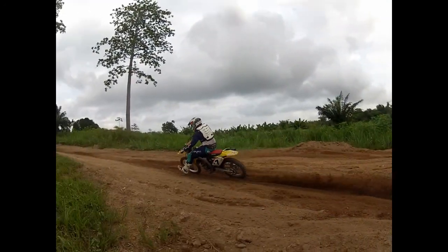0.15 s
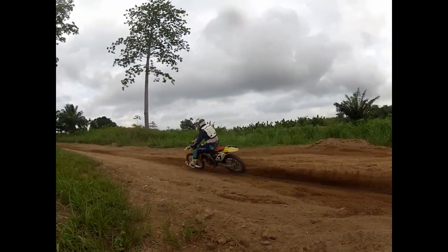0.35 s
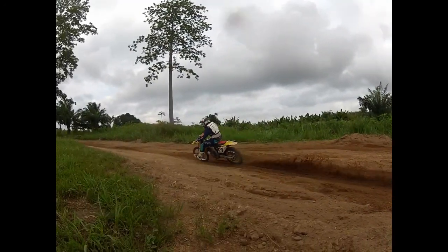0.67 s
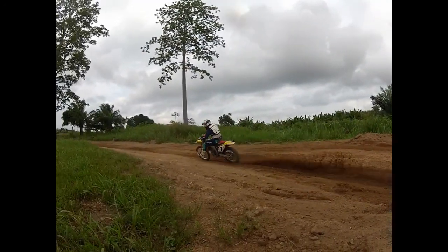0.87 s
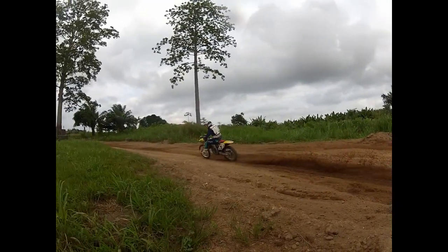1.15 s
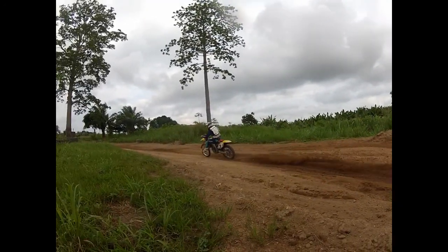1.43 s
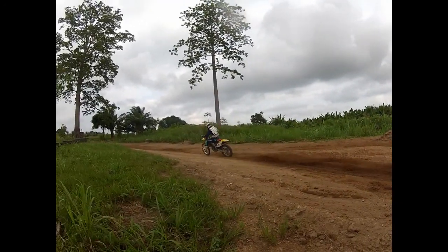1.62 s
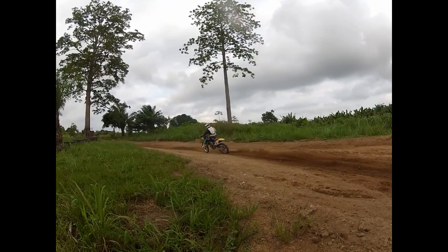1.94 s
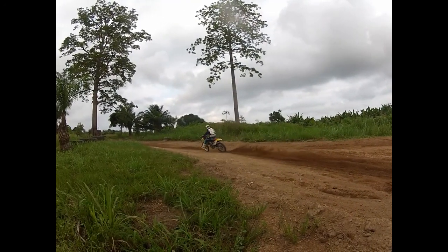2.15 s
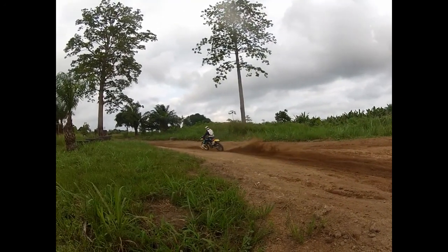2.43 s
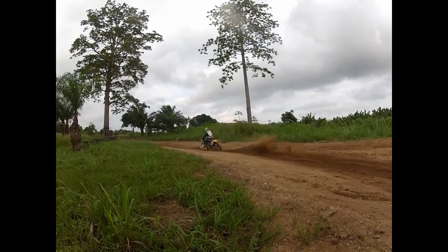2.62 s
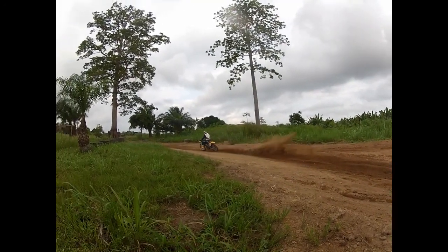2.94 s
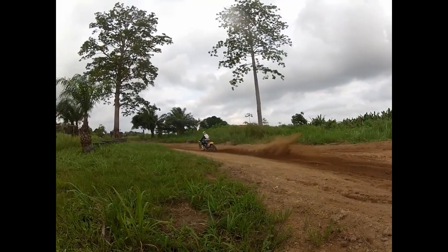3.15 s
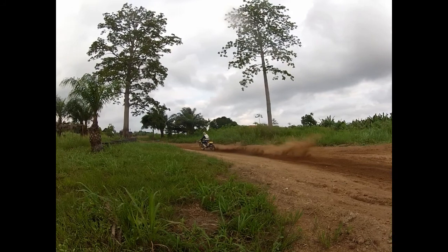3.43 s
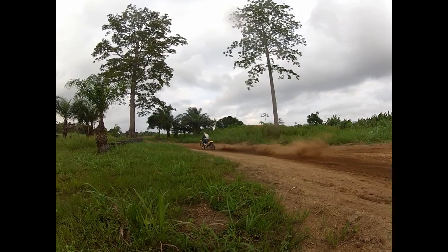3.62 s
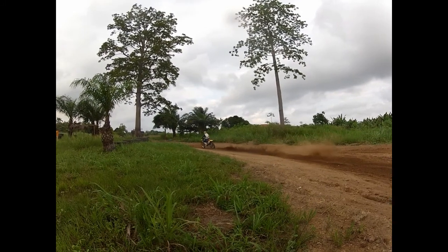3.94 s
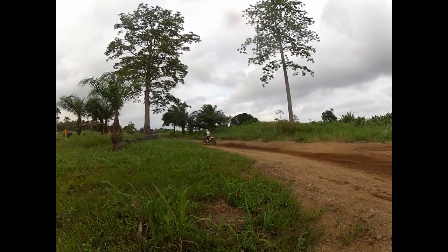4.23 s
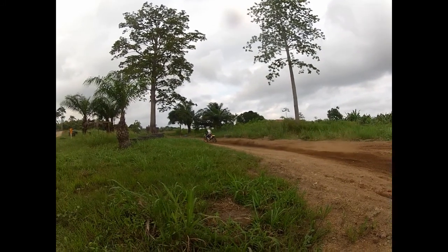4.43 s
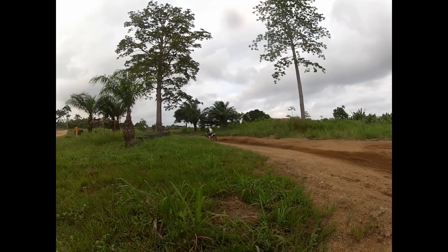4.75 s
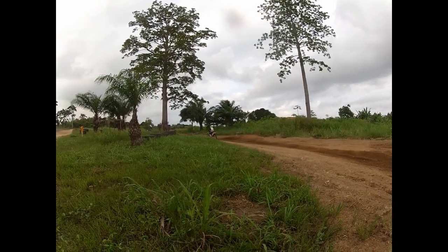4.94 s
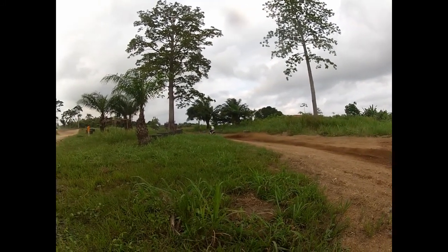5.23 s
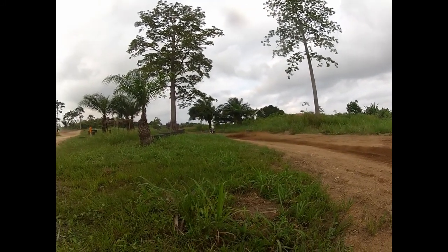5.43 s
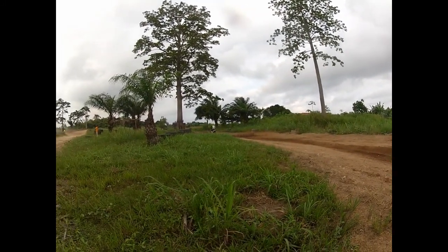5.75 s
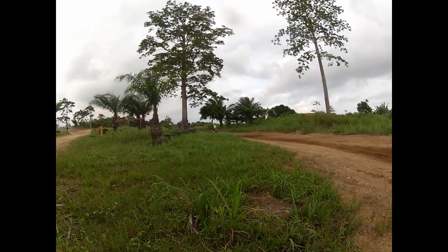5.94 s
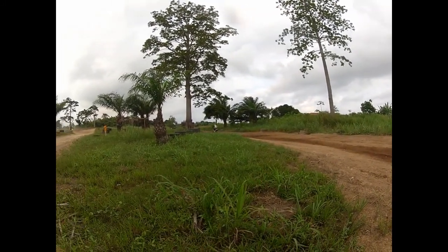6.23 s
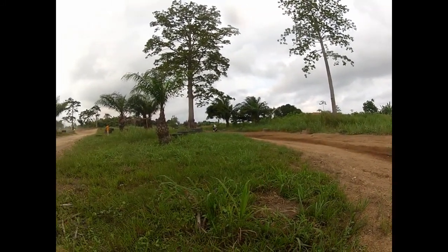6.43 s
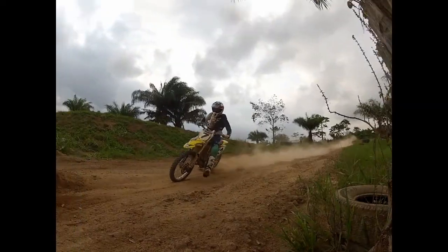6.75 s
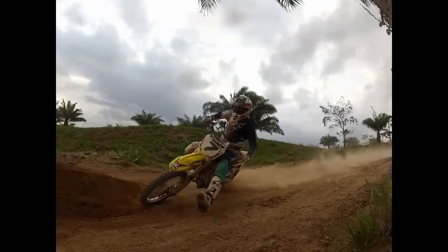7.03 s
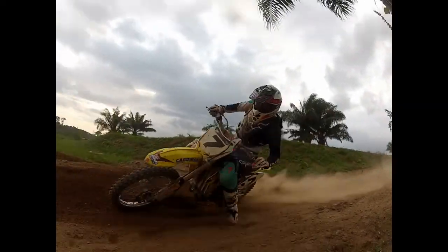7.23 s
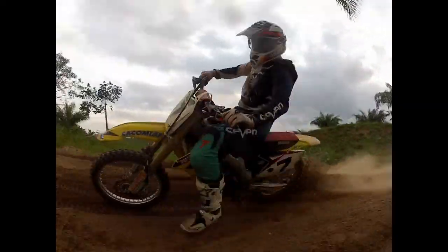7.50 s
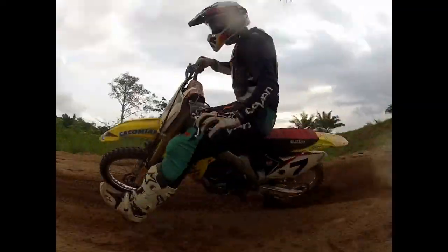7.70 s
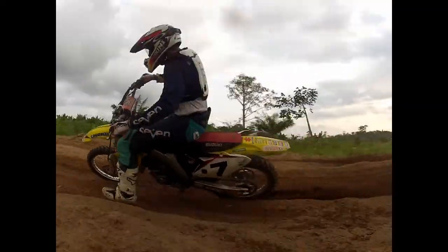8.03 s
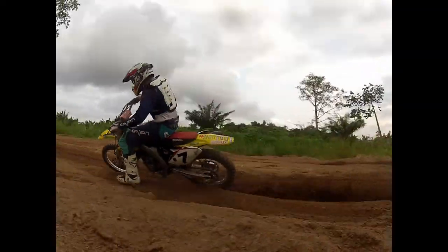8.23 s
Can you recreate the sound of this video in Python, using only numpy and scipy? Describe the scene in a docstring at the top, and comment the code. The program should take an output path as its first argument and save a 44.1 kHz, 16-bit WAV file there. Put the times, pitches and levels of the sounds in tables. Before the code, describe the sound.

A slowed-down dirt bike engine putters and rasps into the distance, then returns and accelerates loudly through a nearby corner.

```python
"""Dirt bike in slow motion

A single-cylinder four-stroke bike rides away round a bend, then brakes into a corner close by.
Each firing thumps the exhaust pipe and blows rasping gas through the silencer; some crack louder.
Slowing holds each sample, which mirrors the sound into the treble. Riding away, it stutters each second."""
import sys
import numpy as np
from scipy import signal
from scipy.io import wavfile
from scipy.ndimage import uniform_filter1d

SR = 44100
rng = np.random.default_rng(int(sys.argv[2]) if len(sys.argv) > 2 else 0)


def unload_audio(sound):
    """Save the sound as a 16-bit wav file, at the path given as the first command line argument."""
    columns = np.transpose(np.atleast_2d(sound))
    # keep every value between -1 and 1, then stretch to whole-number steps
    steps = np.round(np.clip(columns, -1, 1) * 32767)
    wavfile.write(sys.argv[1], SR, steps.astype(np.int16))


N = 369116

# How far the engine has run: time_s, firings_so_far
AWAY_FIRINGS = [(-0.032, 0), (0.443, 9), (0.86, 17), (1.274, 25), (1.475, 29), (1.759, 35), (1.935, 39),
                (2.235, 46), (2.458, 51), (2.813, 59), (3.292, 70), (3.739, 80), (3.864, 83), (4.147, 90),
                (4.379, 96), (4.564, 101), (4.779, 107), (5.005, 113), (5.309, 121), (5.594, 128),
                (6.47, 144)]
# Loudness of the gas rasp, crank hum and pipe rings:
# time_s, main_rasp_db, dark_rasp_db, bright_rasp_db, hum_db, low_ring_db, middle_ring_db, upper_ring_db
AWAY_LEVELS = [(0.04, -28, -23.5, -30, -26, -23, -24.5, -23.5),
               (0.15, -27.5, -28.5, -30.5, -29.5, -26, -29.5, -31),
               (0.51, -22.5, -29, -28, -25.5, -24.5, -25.5, -28.5),
               (0.54, -31, -23, -30.5, -32, -26.5, -33, -38),
               (0.66, -28, -26.5, -30.5, -28, -30.5, -27, -30.5),
               (1.2, -27, -28, -30.5, -26, -27.5, -27, -34.5), (1.24, -19, -28, -23.5, -26, -27, -25, -31),
               (1.33, -25, -29.5, -31, -31.5, -25, -32, -34),
               (1.9, -25.5, -23, -27.5, -23.5, -27.5, -29, -36.5),
               (2.19, -31.5, -26.5, -35, -27, -39, -33.5, -58),
               (2.39, -33.5, -25, -33.5, -32, -29, -36.5, -46),
               (2.56, -20, -24.5, -26, -27.5, -27, -32, -43),
               (3.17, -23.5, -27.5, -29, -30, -28.5, -33, -50),
               (3.66, -17, -31, -24.5, -31, -28.5, -34, -39.5),
               (4.05, -23, -27.5, -29.5, -31.5, -38, -38.5, -40.5),
               (4.55, -23.5, -29.5, -28.5, -25, -40.5, -37, -39),
               (5.16, -22.5, -32.5, -28.5, -34, -36.5, -40.5, -41.5),
               (5.25, -22, -26.5, -28.5, -29.5, -39.5, -40, -50),
               (5.29, -36, -39, -37.5, -37, -39, -63, -57), (5.45, -50, -52, -54, -44, -52, -57, -65),
               (5.77, -32, -39.5, -36.5, -36.5, -37.5, -47, -62),
               (6.06, -39, -39.5, -43, -37, -39, -51, -58), (6.27, -50, -48.5, -52.5, -43, -49.5, -60, -66),
               (6.47, -58, -61, -61.5, -44, -53, -67, -69)]
# The pipe's low ring: time_s, pitch_hz
AWAY_PITCH = [(0.0, 92.5), (1.2, 98.7), (2.301, 109), (3.601, 107.9), (4.601, 97), (6.502, 78)]
# Firings that crack louder: start_s, strength_db
AWAY_CRACKS = [(0.022, 0.5), (0.076, 3), (0.6, -3.5), (0.65, 2), (0.703, 1), (0.758, -10.5), (0.808, -5.5),
               (0.86, -2), (0.912, 4.5), (0.962, 3), (1.224, 2), (1.474, 0.5), (1.806, 1), (2.416, -10.5),
               (2.459, -8), (2.678, -47), (2.723, -5), (2.765, -5), (2.991, -3.5), (3.031, -2), (3.293, -9),
               (3.341, -3.5), (3.616, -8), (4.34, -5.5), (4.569, -12), (4.742, -4), (4.897, -2.5),
               (5.007, -4), (5.599, -17)]
# Silencer tones for the rasp and for the cracks: pitch_hz, width_hz, gain_db
AWAY_RASP_TONES = [(564, 207, 7), (630, 128, 10), (775.2, 31.7, 2.5), (898, 75, -17), (1233, 173, 5.5),
                   (1643, 60, -24), (1754, 43, -2), (2437, 51, -1.5), (2660, 120, -6.5), (2981, 52, 3.5),
                   (3401, 52.3, 7.5), (3663, 87, -3), (4180, 300, -14)]
AWAY_CRACK_TONES = [(627, 146, -7), (1282, 53, -5.5), (1535, 57, -13), (1960, 37, -22), (2270, 41, -18.5),
                    (2910, 120, -18.5), (3110, 17, -23.5), (3420, 110, -16.5)]


def riding_away():
    """The bike pulls away, eases off near 5.3 s, then briefly picks up again, quieter and slower."""
    start, sound = engine(
        AWAY_FIRINGS, AWAY_LEVELS, span_s=(0, 6.484), coast_end_s=-1, repeat_share=.38,
        pipe=dict(pitch=AWAY_PITCH, middle_hz=143.4, upper_ratio=2.207, overtone_db=-9, lead_s=.0005,
                  decays_s=(.012, .011, .007, .0077), middle_delay_s=0, return_s=.02207, return_db=-3.5),
        rasp=dict(tones=AWAY_RASP_TONES, main_band_hz=(690, 980), uneven_db=1.46, hiss_db=-15.5,
                  rises_s=(.0008, .003, .001), decay_s=.018, stretches=(.45, 2.8, 1.1), shape=.75,
                  bends=(.05, .045, .015), echo_s=.024, echo_db=-20),
        crack=dict(listed=AWAY_CRACKS, tones=AWAY_CRACK_TONES, gain_db=20, decay_s=.0043, shape=1.53))
    sound = hold_samples(sound, 8400)
    # cut out most of the first mirror image and dim the higher ones
    low = signal.sosfilt(signal.ellip(10, .5, 55, 5330, fs=SR, output="sos"), sound)
    top = signal.sosfilt(signal.ellip(8, .5, 34, 11450, "high", fs=SR, output="sos"), sound)
    return start, stutter(low + from_db(-6) * filtered(top, 3, 13500, "low"))


# How far the engine has run: time_s, firings_so_far
CORNER_FIRINGS = [(6.496, 0), (6.65, 3), (6.785, 6), (6.86, 8), (6.924, 10), (6.978, 12), (7.097, 17),
                  (7.183, 20), (7.417, 27), (7.556, 32), (7.675, 36), (7.724, 38), (7.814, 42), (7.91, 46),
                  (8.089, 53), (8.376, 64)]
# Loudness of the gas rasp, crank hum and pipe rings:
# time_s, main_rasp_db, dark_rasp_db, bright_rasp_db, hum_db, low_ring_db, middle_ring_db, upper_ring_db
CORNER_LEVELS = [(6.5, -64.5, -70, -67, -54, -43.5, -45, -57),
                 (6.808, -58.5, -64, -61, -45, -35, -46.5, -44),
                 (6.974, -50.5, -58, -52, -45, -31, -44, -45),
                 (7.058, -47.5, -52, -48.5, -42, -31, -36, -44), (7.176, -53, -53, -53, -47, -31, -50, -50),
                 (7.294, -43.5, -45, -46, -49, -28, -47, -32),
                 (7.652, -44.5, -46, -48, -32, -24.5, -50, -50), (7.686, -43, -39, -49, -27, -34, -30, -39),
                 (7.7, -27, -29, -29.5, -26, -21.5, -23, -21.5),
                 (7.734, -21.5, -25, -26, -25, -23, -15.5, -20.5),
                 (7.822, -29, -28, -30.5, -29, -21.5, -20, -21.5),
                 (7.946, -27.5, -27.5, -25, -25.5, -26, -16.5, -21),
                 (8.122, -28, -27, -29, -26, -22.5, -19, -19.5),
                 (8.254, -26.5, -33, -29.5, -35, -29, -21.5, -21),
                 (8.26, -28, -32.5, -30.5, -28, -26, -21.5, -23.5)]
# The pipe's low ring: time_s, pitch_hz
CORNER_PITCH = [(6.5, 149), (6.82, 151), (6.95, 183), (7.07, 192), (7.2, 155), (7.42, 148), (7.48, 193),
                (7.54, 145), (7.66, 128), (7.7, 152), (8.37, 149)]
# Silencer tones for both rasp and cracks: pitch_hz, width_hz, gain_db
CORNER_TONES = [(512, 72, 1), (810, 250, -1.5), (1170, 99, -0.5), (1608, 260, 11), (2240, 286, 9.5),
                (3490, 400, 3), (4750, 860, 3.5), (4940, 960, 3)]


def cornering():
    """The bike coasts into the corner; then the throttle opens and every firing cracks."""
    start, sound = engine(
        CORNER_FIRINGS, CORNER_LEVELS, span_s=(6.495, 8.37), coast_end_s=7.69, repeat_share=.39,
        pipe=dict(pitch=CORNER_PITCH, middle_hz=251.8, upper_ratio=2.05, overtone_db=-20.5,
                  lead_s=.0011, decays_s=(.017, .011, .0094, .007), middle_delay_s=.01118),
        rasp=dict(tones=CORNER_TONES, main_band_hz=(1300, 3000), uneven_db=-1.3, hiss_db=-18,
                  rises_s=(.0008, .001, .001), decay_s=.0082, stretches=(1.2, 1.4, 1.4), shape=1.03,
                  bends=(.03, .03, .01), echo_s=.016, echo_db=-29),
        crack=dict(tones=CORNER_TONES, gain_db=-5.5, decay_s=.0053, shape=1.6))
    return start, hold_samples(sound, 12000)


def engine(firings, levels, span_s, coast_end_s, repeat_share, pipe, rasp, crack):
    """The firings drive thump, rasp, cracks and hum. Returns the start sample and the sound."""
    start, stop = round(span_s[0] * SR), min(round(span_s[1] * SR), N)
    t = np.arange(start, stop) / SR
    times, counts = np.transpose(firings)
    fired = np.interp(np.arange(counts[-1] + 1), counts, times)
    fired[1:-1] = np.convolve(fired, [.25, .5, .25], "valid")   # the engine speed changes smoothly from firing to firing
    cycles = np.interp(t, fired, np.arange(len(fired)))
    age = t - fired[cycles.astype(int)]
    luck = rng.standard_normal((len(fired), 6)).T   # no two firings are alike
    # part of the swirling gas repeats with each firing, which gives the rasp its pitch
    pattern, fresh = rng.standard_normal((2, len(t)))
    gas = np.sqrt(repeat_share) * pattern[(age * SR).astype(int)] + np.sqrt(1 - repeat_share) * fresh
    sound = pipe_thump(t, fired, levels, coast_end_s, luck, **pipe)
    sound += gas_rasp(t, fired, cycles, gas, levels, coast_end_s, luck, **rasp)
    sound += loud_cracks(t, fired, gas, coast_end_s, luck, **crack)
    sound += crank_hum(t, cycles, levels)
    return start, .95 * np.tanh(sound / .95)   # round off the highest peaks


def pipe_thump(t, fired, levels, coast_end_s, luck, pitch, middle_hz, upper_ratio, overtone_db,
               lead_s, decays_s, middle_delay_s, return_s=0, return_db=-np.inf):
    """Each firing sets the air in the exhaust pipe ringing at a few low pitches."""
    low_hz, = columns(pitch, fired)
    upper_hz = upper_ratio * low_hz
    *_, low_db, middle_db, upper_db = columns(levels, fired)
    after_coast = fired > coast_end_s
    # coasting into the corner, the rings die sooner
    low_s, middle_s, upper_s, overtone_s = np.outer(decays_s, np.where(after_coast, 1, .55))
    starts = fired - lead_s
    thump = pipe_ring(t, starts, low_hz, low_db + 2.2 * luck[0], low_s)
    # pulling out of it, the middle ring arrives with the pipe's echo
    delayed = starts + middle_delay_s * after_coast
    thump += pipe_ring(t, delayed, np.full(len(fired), middle_hz), middle_db + 1.4 * luck[1], middle_s)
    thump += pipe_ring(t, starts, upper_hz * (1 + luck[3] / 100), upper_db, upper_s)
    thump += pipe_ring(t, starts, upper_hz * 1.55, upper_db + overtone_db, overtone_s)
    thump += pipe_ring(t, starts + return_s, low_hz, low_db + return_db, low_s)   # back from the far end
    return filtered(thump, 2, 55, "high")   # an open pipe gives off little deep bass


def pipe_ring(t, starts, hz, db, decay_s):
    """Each firing starts a fading swing, suction first; four earlier firings still ring."""
    latest = np.searchsorted(starts, t) - 1
    height = from_db(db) * np.sqrt(4 * np.gradient(starts) / decay_s)
    out = np.zeros(len(t))
    for back in range(5):
        k = np.maximum(latest - back, 0)
        age = np.maximum(t - starts[k], 0)
        envelope = height[k] * np.tanh(age / .001) * np.exp(-age / decay_s[k])
        out -= (latest >= back) * envelope * np.sin(2 * np.pi * hz[k] * age)
    return out


def gas_rasp(t, fired, cycles, gas, levels, coast_end_s, luck, tones, main_band_hz, uneven_db, hiss_db,
             rises_s, decay_s, stretches, shape, bends, echo_s, echo_db):
    """Gas rushes through the silencer, surges on the pipe's echo and is choked before the next firing."""
    firing = cycles.astype(int)
    age = t - fired[firing]
    echo_age = np.maximum(age - echo_s, 0)
    choke = np.clip((1 - cycles + firing) / .48, 0, 1)
    hiss = from_db(np.where(t > coast_end_s, hiss_db, -3))   # coasting, the hiss hardly pulses
    main_db, dark_db, bright_db, *_ = columns(levels, t)
    tones, samples = np.array(tones), np.arange(len(t))
    tone_band = np.digitize(tones[:, 0], main_band_hz)
    rasp = np.zeros(len(t))
    for k, db in enumerate((dark_db, main_db, bright_db)):
        is_main = k == 1
        fade_s = decay_s * stretches[k] * np.exp(.3 * luck[4, firing])
        rush = (1 - np.exp(-age / rises_s[k])) * np.exp(-np.abs(age / fade_s) ** shape)
        rush += from_db(echo_db) * (1 - np.exp(-echo_age / .0005)) * np.exp(-echo_age / fade_s)
        band = silencer(gas, tones[tone_band == k])
        if is_main:
            band = filtered(band, 2, main_band_hz, "band")
        # hot gas lifts the pitch midway between firings
        slip = bends[k] * SR * np.gradient(fired)[firing] * np.sin(2 * np.pi * cycles) / (2 * np.pi)
        band = np.interp(samples - slip, samples, band)
        # a ring driven by the flow limits its own swing
        band /= (np.abs(uniform_filter1d(band ** 2, size=200)) + 1e-12) ** (.4 if is_main else .12)
        band *= rush * choke + hiss
        # bring each firing to its level, give or take a little
        power = np.bincount(firing, band ** 2) / np.maximum(np.bincount(firing), 1) + 1e-12
        gain = from_db(uneven_db * luck[2, :len(power)]) / np.sqrt(power)
        rasp += from_db(db) * band * uniform_filter1d(gain[firing], size=100)
    return filtered(rasp, 4, 380, "high")


def loud_cracks(t, fired, gas, coast_end_s, luck, tones, gain_db, decay_s, shape, listed=None):
    """Short, hard bursts hit the silencer: those listed, or else one per firing after coasting."""
    if listed is None:
        pulling = fired > coast_end_s
        starts = fired[pulling]
        db = 1.5 * luck[5, pulling] - 4 * np.exp((coast_end_s - starts) / .063)   # softer at first
    else:
        starts, db = np.transpose(listed)
    latest = np.maximum(np.searchsorted(starts, t) - 1, 0)
    age = np.maximum(t - starts[latest], 0)
    burst = from_db(db[latest] + gain_db) * np.tanh(age / .0009) * np.exp(-(age / decay_s) ** shape)
    return silencer(burst * np.sign(gas) + 1e-18, tones)


def silencer(gas, tones):
    """The silencer rings at several tones at once, added with alternating signs."""
    out = np.zeros(len(gas))
    for k, (hz, width_hz, db) in enumerate(tones):
        r = np.exp(-np.pi * width_hz / SR)
        feed = (1 - r * r) / 2 * np.array([1, 0, -1])
        feedback = [1, -2 * r * np.cos(2 * np.pi * hz / SR), r * r]
        out += (-1) ** k * from_db(db) * signal.lfilter(feed, feedback, gas)
    return out


def crank_hum(t, cycles, levels):
    """The crank turns twice per firing and hums deeply."""
    hum_db = columns(levels, t)[3]
    wave = np.sin(4 * np.pi * cycles - 1.5) + .18 * np.sin(2 * np.pi * cycles - .6)
    return from_db(hum_db) * np.sqrt(2) * wave


def hold_samples(sound, hold_hz):
    """Holding each sample until the next adds mirror images of the sound in the treble."""
    fine = signal.resample_poly(sound, 4, 1)
    fine = signal.sosfilt(signal.cheby2(14, 30, .515 * hold_hz, fs=SR * 4, output="sos"), fine)
    samples, step = np.arange(len(fine)), SR * 4 / hold_hz
    stairs = np.interp(np.floor(samples / step) * step, samples, fine)
    return signal.resample_poly(stairs, 1, 4)


# Moments when the sound repeats itself: start_s, length_s
STUTTERS = [(0.4843, .03), (1.4843, .058), (2.4843, .045), (3.4843, .06), (4.4843, .05), (5.4843, .06)]


def stutter(sound, back_s=.06095, fade_s=.005):
    """Each stutter jumps to what was just heard, then fades back to the running sound."""
    t, repeat = np.arange(len(sound)) / SR, 0
    for start_s, length_s in STUTTERS:
        repeat += (t >= start_s) * np.clip((start_s + length_s - t) / fade_s + .5, 0, 1)
    return (1 - repeat) * sound + repeat * np.roll(sound, round(back_s * SR))


def from_db(db):
    """Decibels to gain."""
    return 10 ** (np.asarray(db) / 20)


def columns(table, t):
    """A table's value columns, read at times t."""
    times, *values = np.transpose(table)
    return [np.interp(t, times, column) for column in values]


def filtered(sound, order, hz, kind):
    """Keeps the lows, the highs or a band."""
    return signal.sosfilt(signal.butter(order, hz, kind, fs=SR, output="sos"), sound)


def scene():
    """The two stretches follow each other with a short gap, over a very faint hiss."""
    out = 1e-5 * rng.standard_normal(N)
    for start, sound in (riding_away(), cornering()):
        out[start:start + len(sound)] += sound
    return out[None]


def record(dry):
    """The deepest bass and the highest treble are cut."""
    dry = filtered(dry, 2, 22, "high")
    return signal.sosfilt(signal.cheby2(12, 70, 15880, fs=SR, output="sos"), dry)


dry = scene()
out = record(dry)
unload_audio(out)
```